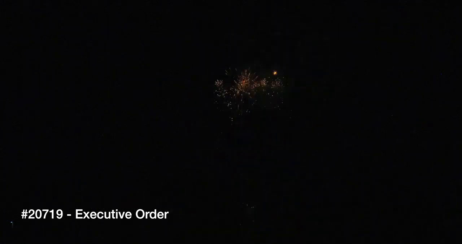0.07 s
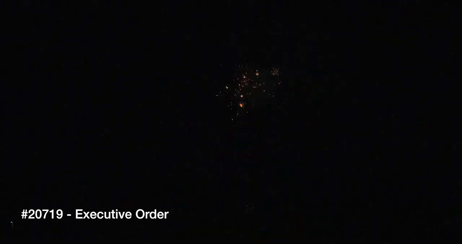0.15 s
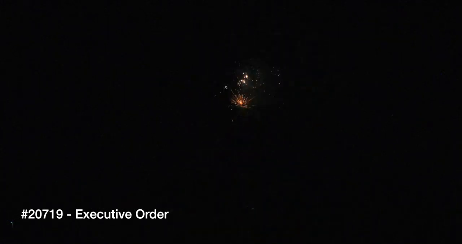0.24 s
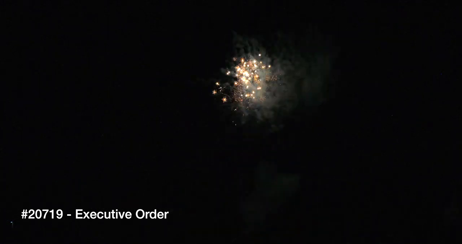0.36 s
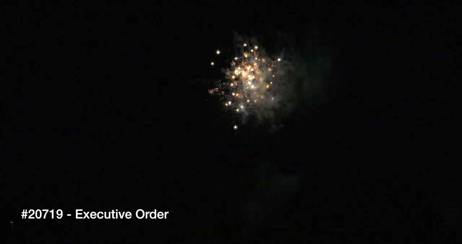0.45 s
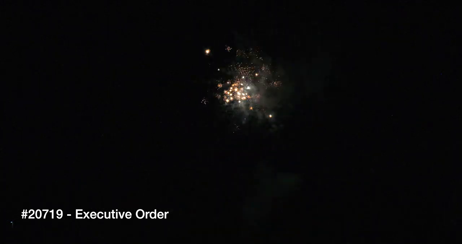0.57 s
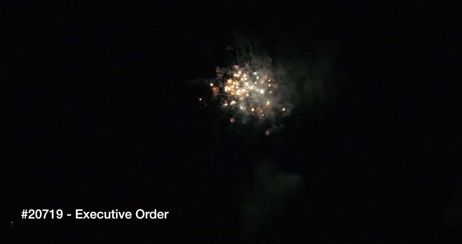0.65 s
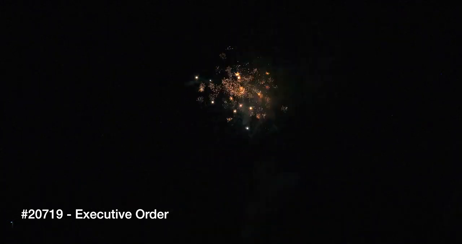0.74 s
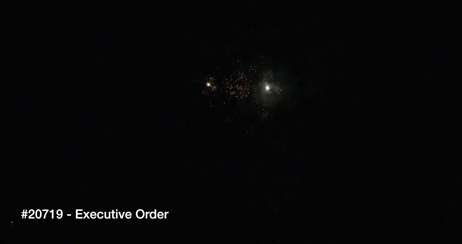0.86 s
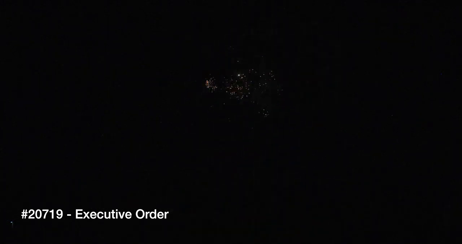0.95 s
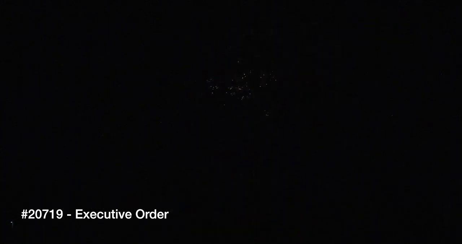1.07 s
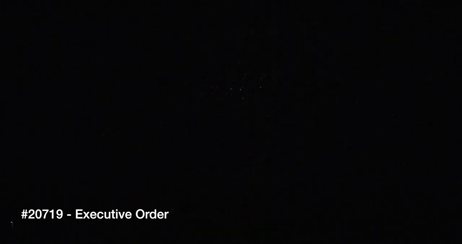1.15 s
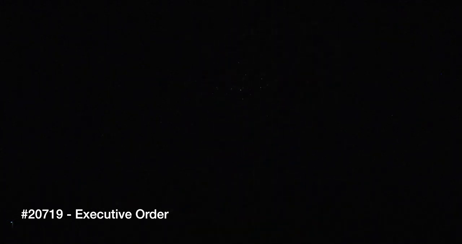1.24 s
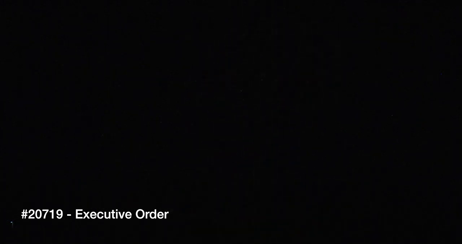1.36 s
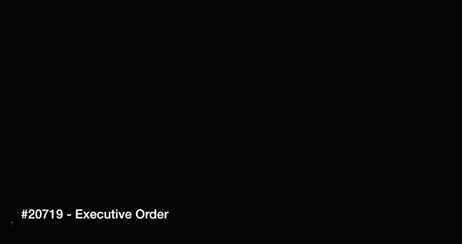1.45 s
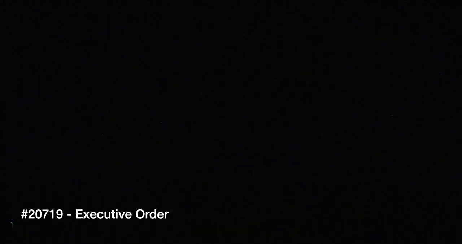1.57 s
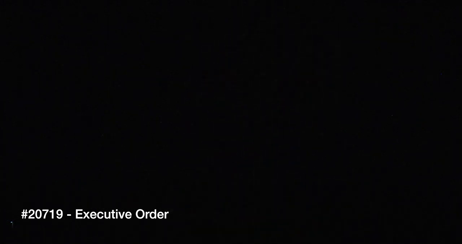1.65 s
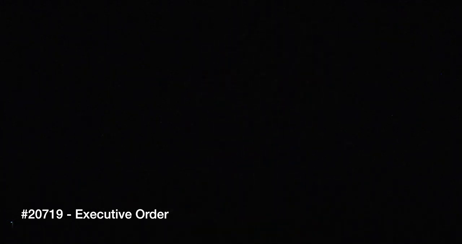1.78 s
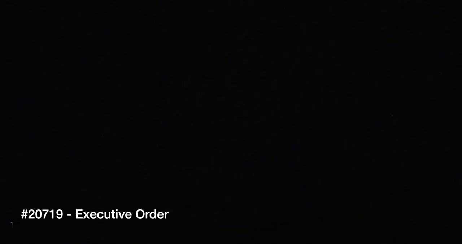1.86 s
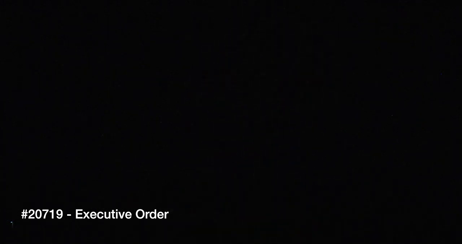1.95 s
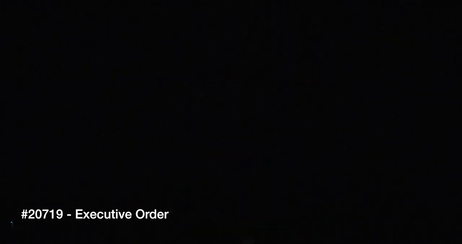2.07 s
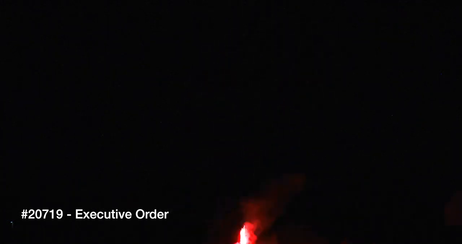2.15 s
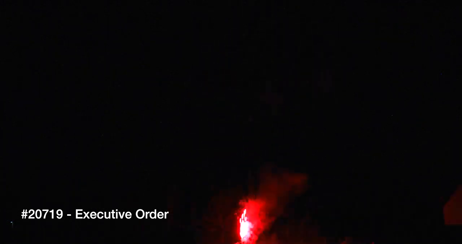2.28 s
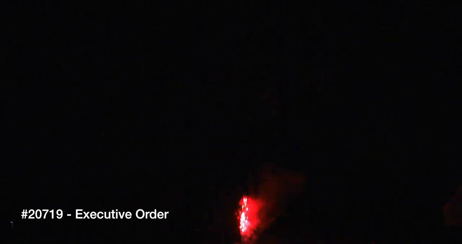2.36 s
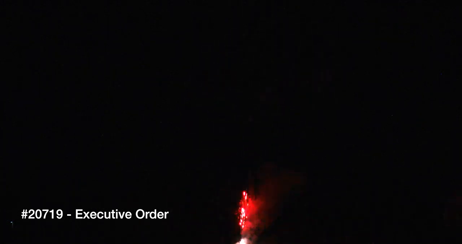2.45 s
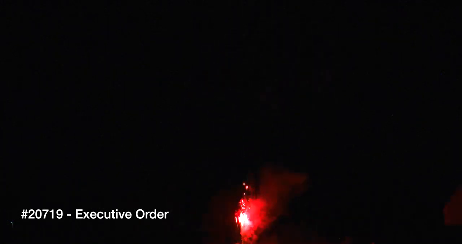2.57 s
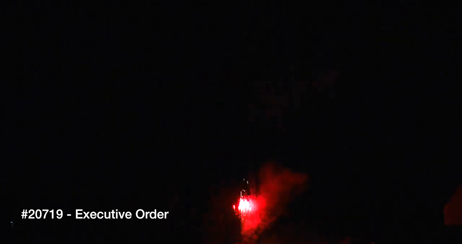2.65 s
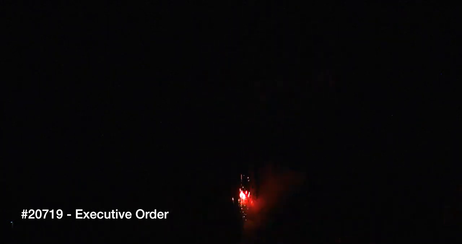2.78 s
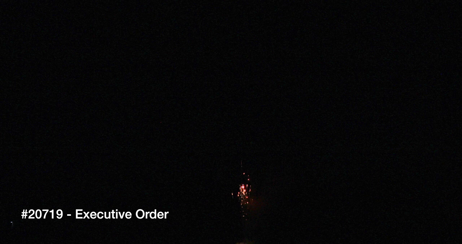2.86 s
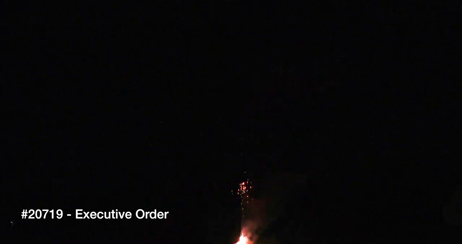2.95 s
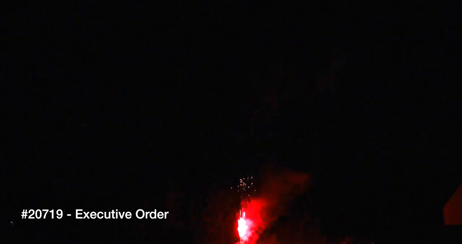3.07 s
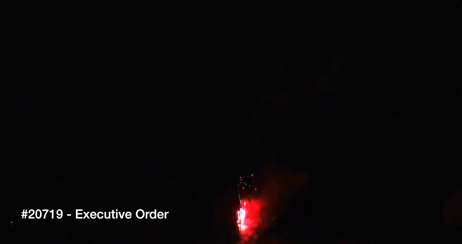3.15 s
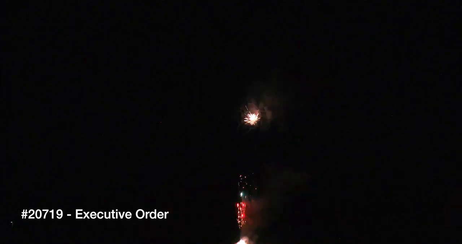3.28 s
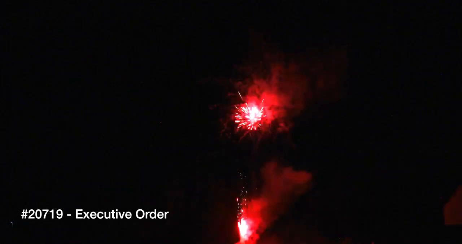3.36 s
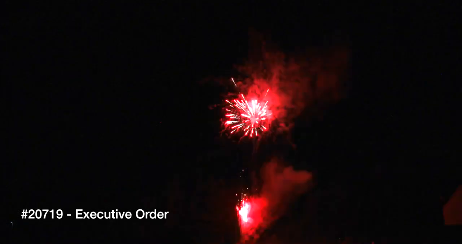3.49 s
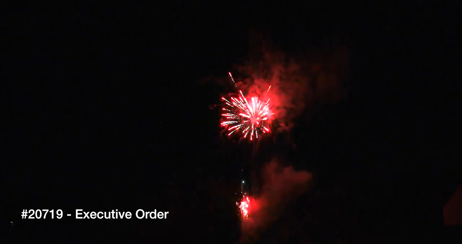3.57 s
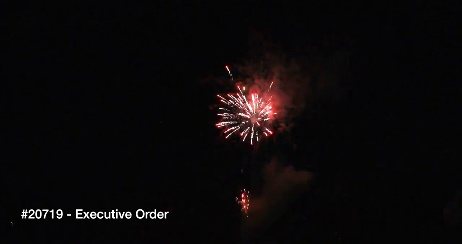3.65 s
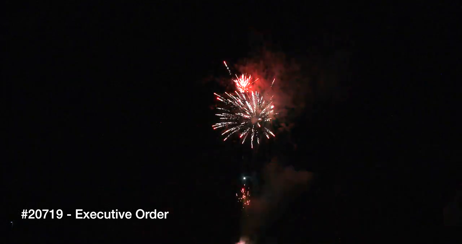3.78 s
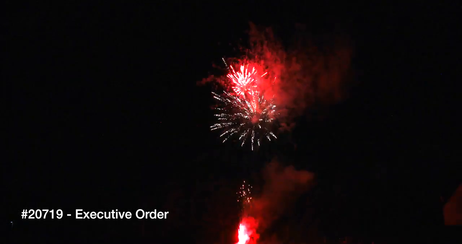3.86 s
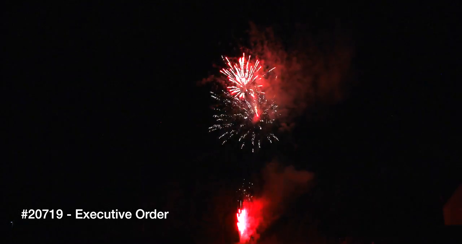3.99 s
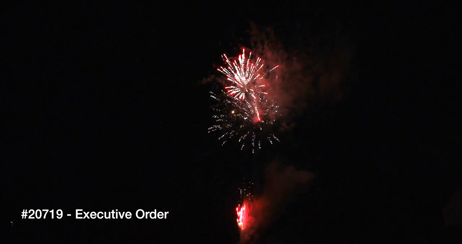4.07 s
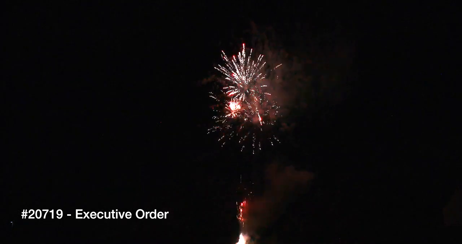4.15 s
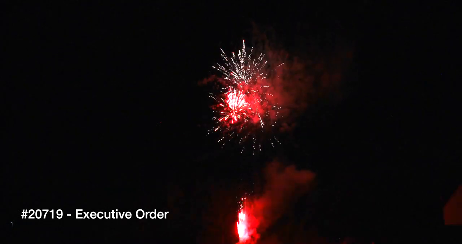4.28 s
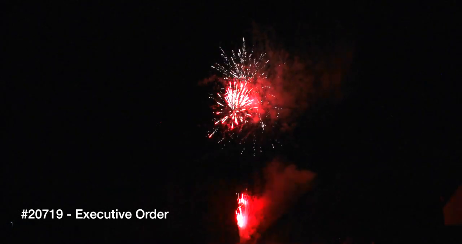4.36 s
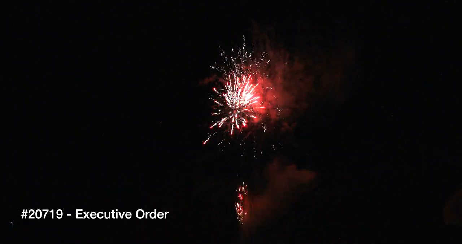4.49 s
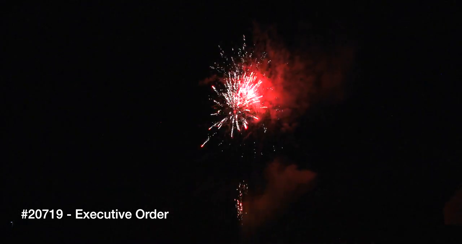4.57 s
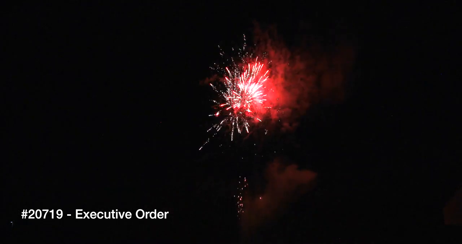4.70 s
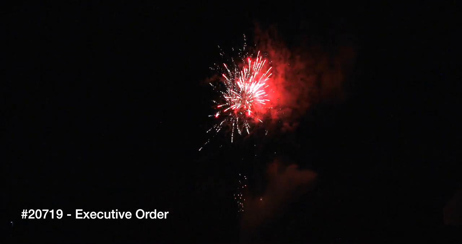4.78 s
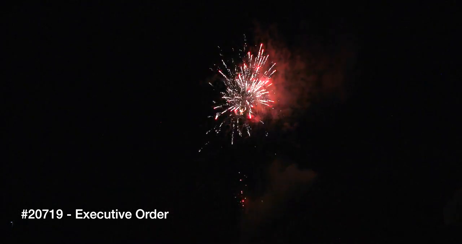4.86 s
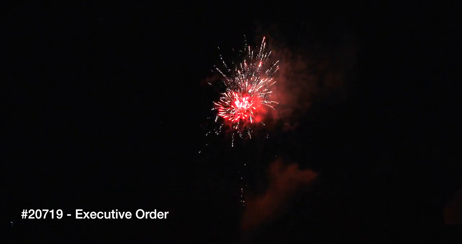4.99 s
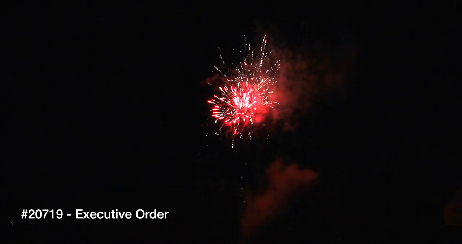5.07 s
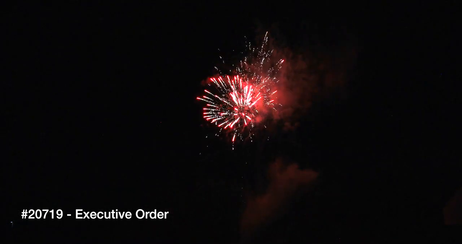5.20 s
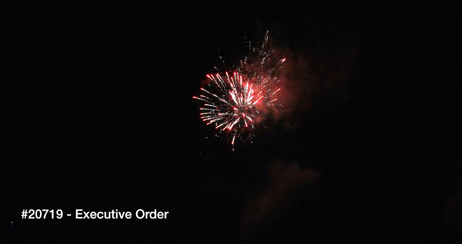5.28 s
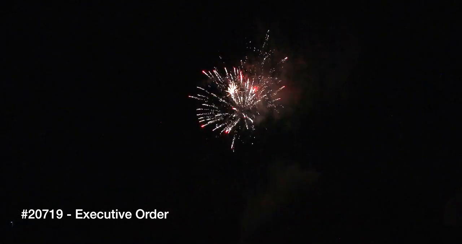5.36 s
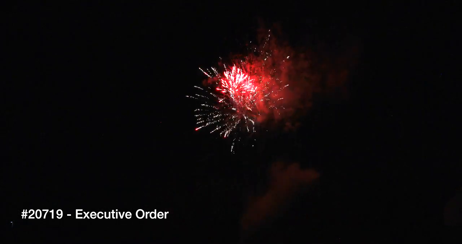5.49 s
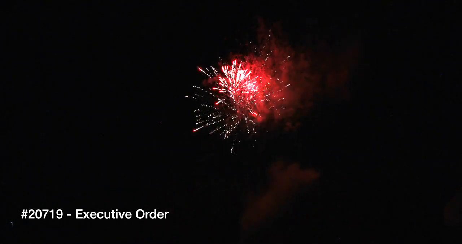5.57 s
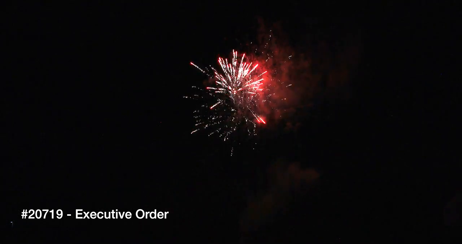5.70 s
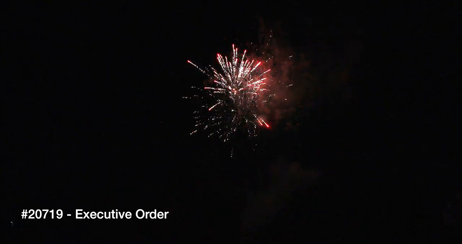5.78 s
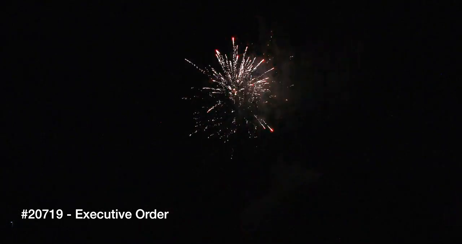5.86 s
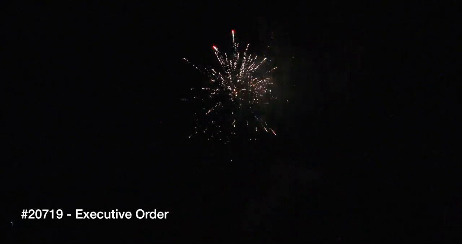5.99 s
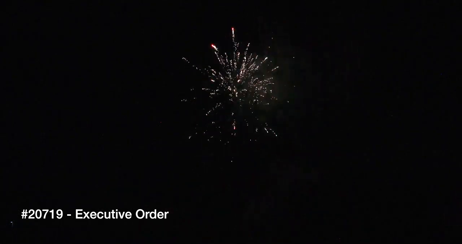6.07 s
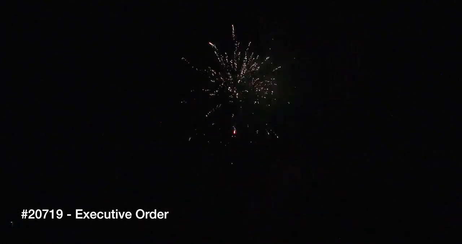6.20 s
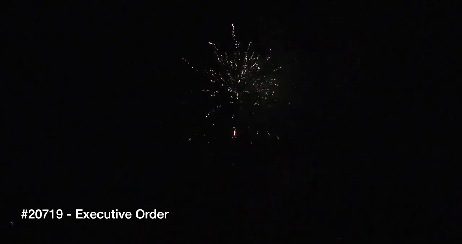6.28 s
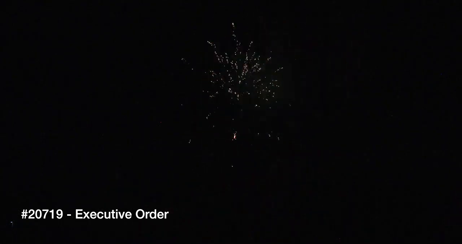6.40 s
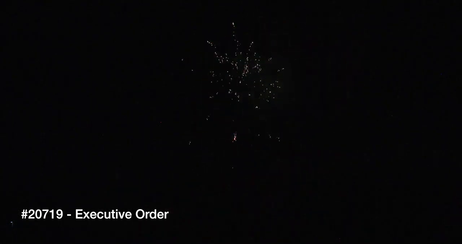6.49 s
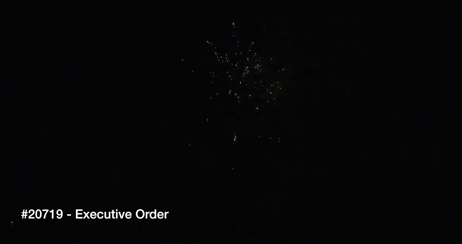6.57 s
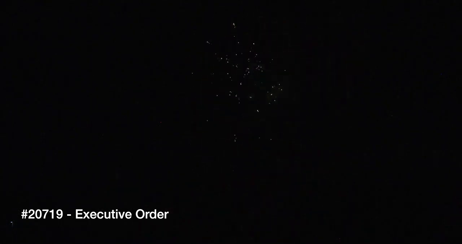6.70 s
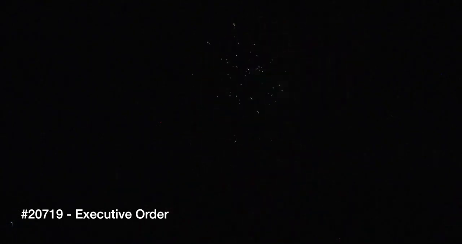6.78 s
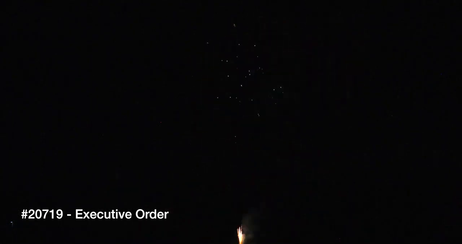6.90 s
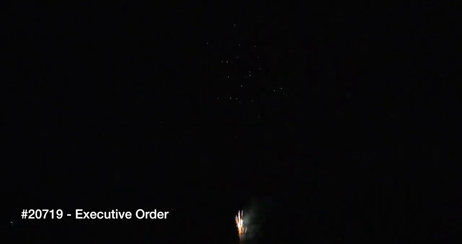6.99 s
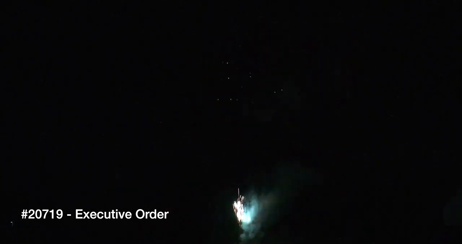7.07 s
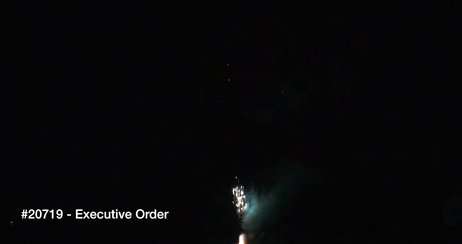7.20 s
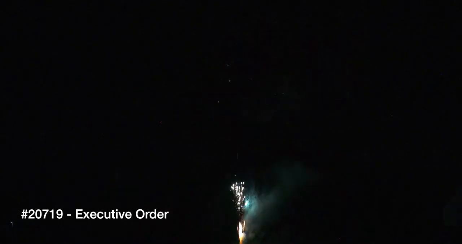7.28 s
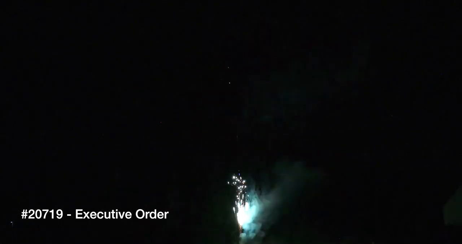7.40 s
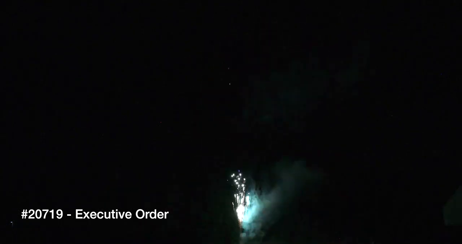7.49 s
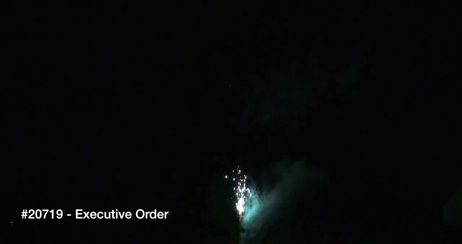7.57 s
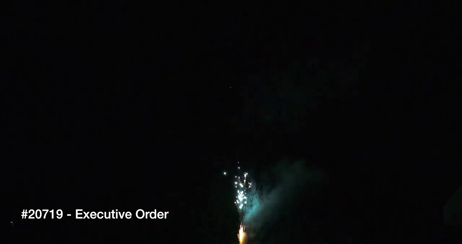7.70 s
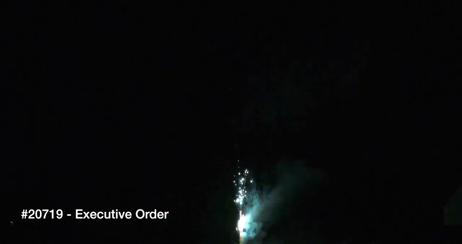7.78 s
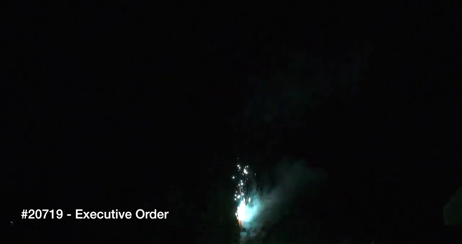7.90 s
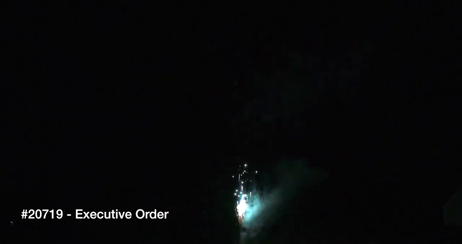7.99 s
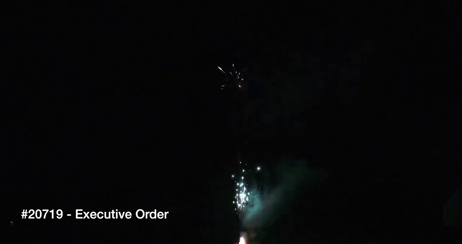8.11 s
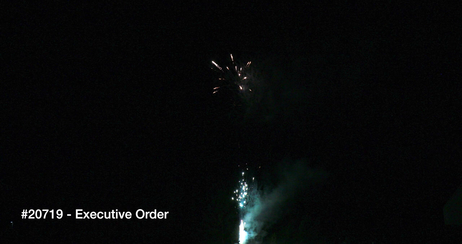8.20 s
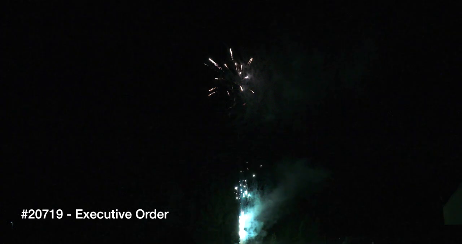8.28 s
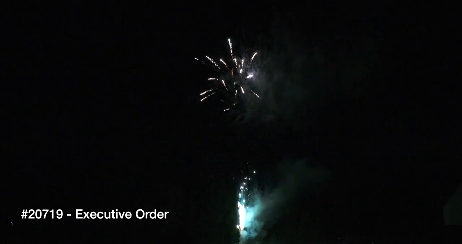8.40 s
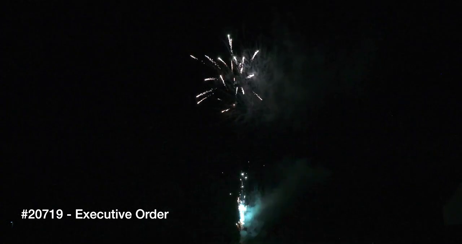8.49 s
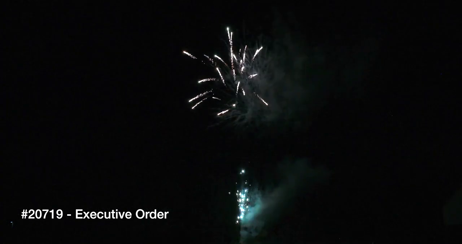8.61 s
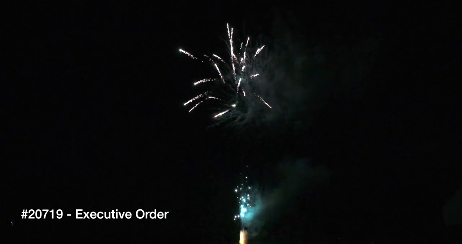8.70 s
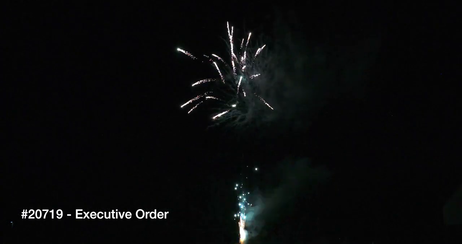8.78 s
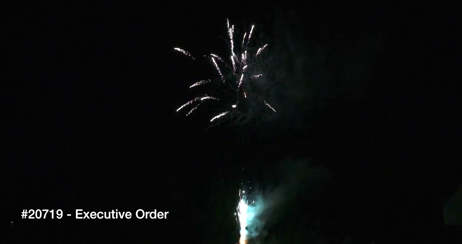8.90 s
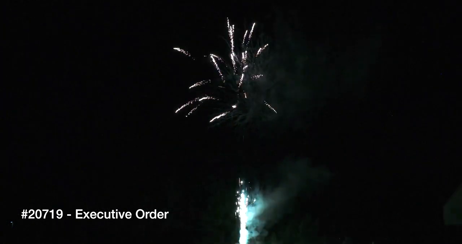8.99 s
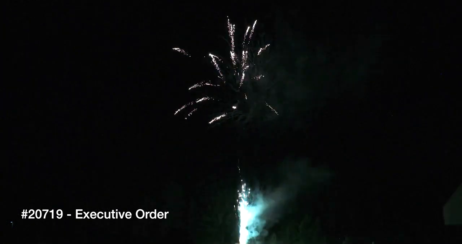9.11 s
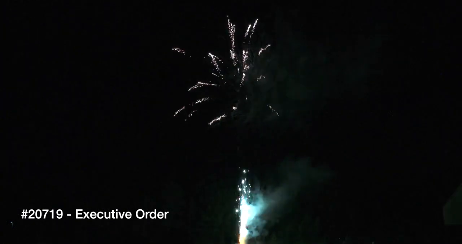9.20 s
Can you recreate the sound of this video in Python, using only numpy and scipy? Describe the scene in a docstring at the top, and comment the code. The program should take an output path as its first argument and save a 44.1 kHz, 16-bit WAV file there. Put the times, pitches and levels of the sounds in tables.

```python
"""Fireworks cake at night

Heard from a yard with a house wall behind and trees around. Shell bursts and mortar thumps are band-passed
clicks, returned by ground, wall, yard and trees. Comets hiss upward and echoes roll back as shaped noise.
Clouds of crackling stars are thousands of random tiny pops, and die out first; a far hum is a sine.
Loud blasts clip and duck the recorder's gain, so the echoes swell up after them."""
import sys
import numpy as np
from scipy import signal
from scipy.io import wavfile
from scipy.ndimage import minimum_filter1d

SR = 44100
rng = np.random.default_rng(int(sys.argv[2]) if len(sys.argv) > 2 else 0)


def persist_wave(psi):
    """Save psi, clipped to +-1, as 16-bit WAV."""
    counts = np.round(np.clip(psi, -1, 1) * 32767).astype(np.int16)
    wavfile.write(sys.argv[1], SR, np.atleast_2d(counts).T)


N = 407925
STEP = 32   # samples per point of the slow envelopes
TIME = np.arange(N) / SR
SLOW = TIME[::STEP]


# shell bursts: (time [s], relative bang level [dB], relative echo level [dB])
BURSTS = [(0.2981, 9.5, -9), (0.5498, 11.5, -11), (3.5997, 18.5, 6), (4.0616, 23, 3.5), (4.4750, 23, 3.5),
          (4.8180, 24, 2), (5.2391, 22.5, 2.5), (5.7234, 21.5, 2), (8.3450, 20.5, 4.5), (8.5586, 24.5, 2.5),
          (9.2430, 15, 12)]
# sky to microphones; direct, ground, wall, wall and ground, tree line: (delay [s], left [dB], right [dB])
SKY_PATHS = [(0, 4, 5.5), (.0038, -1, -7.5), (0.0119, 2.5, 4.5), (0.015, -18, 3), (.081, -7.5, -16)]


def shells(rate_ratio=0.996):
    """A burst is a short blast with a sharp shock front and low punch; strong echoers also recoil deeply."""
    fired = clicks(BURSTS)
    bang = from_db(-7) * blast(fired, low_hz=980, high_hz=6270)
    for k in range(3):   # no two shells in a row swing at the same rate
        rate = rate_ratio ** (k - 1)
        bang = bang + blast(clicks(BURSTS[k::3]), low_hz=420 * rate, high_hz=1200 * rate)
    punch = from_db(-23.5) * blast(fired, low_hz=166, high_hz=308)
    recoil_train = clicks([(s, bang_db + echo_db) for s, bang_db, echo_db in BURSTS])
    recoil = from_db(-39) * blast(recoil_train, low_hz=25, high_hz=212)
    yard = scatter(bang, low_hz=530, high_hz=1560, t60_s=0.23, level_db=2.5)
    yard = yard + scatter(bang, low_hz=1580, high_hz=6840, t60_s=0.093, level_db=6)
    return arrive(bang - punch + recoil, SKY_PATHS) + yard


# mortar shots: (time [s], relative thump level [dB], relative comet hiss level [dB])
LIFTS = [(2.4604, 6.5, -2), (2.7978, 6, -5), (3.2585, 6, -3.5), (4.1412, 14.5, 6), (4.5280, 9, 3),
         (7.2219, 8.5, 3.5), (7.5495, 9, 0.5), (8.0028, 9, -2), (8.443, 11, -6), (9.032, 13, 2.5),
         (9.2105, 10.5, 4)]
# cake to microphones; direct, wall: (delay [s], left [dB], right [dB])
LOW_PATHS = [(0, -1, 1.1), (0.0118, -5.5, -1.5)]
SPIT_RE_THUMP_DB = -13.5


def mortars(leak_s=0.0016, spit_s=0.0041):
    """Gas spits past the shell, then the tube uncorks with a low thump and a deep push."""
    fired = clicks(LIFTS)
    thump = blast(fired, low_hz=115, high_hz=255.5)
    broad_push = from_db(-17.5) * blast(fired, low_hz=56.6, high_hz=560)   # escaping gas
    deep_train = clicks([(s, thump_db + volley(s)[0]) for s, thump_db, _ in LIFTS])
    deep_push = blast(deep_train, low_hz=49.6, high_hz=100)
    gas = 0
    for s, thump_db, _ in LIFTS:
        rise_and_fall = np.exp(np.minimum((SLOW - s) / leak_s, (s - SLOW) / spit_s))
        gas = gas + from_db(thump_db + SPIT_RE_THUMP_DB) * rise_and_fall
    spit = band(rng.standard_normal(N), 2000, 3640, order=1)
    spit = np.interp(TIME, SLOW, gas) * spit / spit.std()
    shot = thump + broad_push - deep_push + spit
    yard = scatter(shot, low_hz=133, high_hz=496, t60_s=0.27, level_db=-5.5, apart=0.35)
    return arrive(shot, LOW_PATHS) + yard


# each volley's kind of tube and comet: (start [s], deep push re thump [dB], hiss pitch [ratio])
VOLLEYS = [(2.4, -25.5, 0.9), (7.1, -17.5, 1.066)]


def volley(s):
    """Deep push and hiss pitch of the volley that a shot belongs to."""
    return [row[1:] for row in VOLLEYS if row[0] <= s][-1]


# colour of the climbing comet: (frequency [Hz], relative density [dB per Hz])
COMET = [(300, -61), (900, -43), (1400, -45), (1950, -38), (3100, -49), (5000, -51), (9000, -62.5),
         (15000, -71)]
# colour of the mortar's spit off the nearest trees: (frequency [Hz], relative density [dB per Hz])
SPIT_ECHO = [(300, -54), (900, -42), (2000, -42.5), (3200, -42), (4500, -45.5), (7000, -48.5), (10000, -57),
             (15000, -80)]


def comets(tree_line_s=0.061, return_rise_s=0.0023, return_t60_s=0.5,
           climb_s=0.14, climb_rise_s=0.014, climb_t60_s=0.91,
           ground_gain=0.1, first_lag_s=0.00026, last_lag_s=0.0013):
    """Near trees throw the spit back; the hiss, pitched by its volley, builds and dulls as it climbs."""
    def power_at(hz):
        air = (hz / 2000) ** -.25   # treble dies sooner; both t60 hold at 2 kHz
        back, climb = 0, 0
        for s, _, hiss_db in LIFTS:
            back = back + from_db(hiss_db) ** 2 * swell(s + tree_line_s, return_rise_s, return_t60_s * air)
            level_db = hiss_db - 1.0 + at_hz(COMET, hz / volley(s)[1])
            climb = climb + from_db(level_db) ** 2 * swell(s + climb_s, climb_rise_s, climb_t60_s * air)
        return from_db(at_hz(SPIT_ECHO, hz)) ** 2 * back + climb

    hiss = diffuse(power_at, patchy_db=2.0, grain_db=0.0)
    starts = np.array(LIFTS)[:, 0]
    latest = starts[np.maximum(np.searchsorted(starts, TIME) - 1, 0)]
    age = np.abs(TIME - latest)
    # the ground reflection lags more with height
    lag = last_lag_s + (first_lag_s - last_lag_s) * np.exp(-age / .5)
    return hiss + ground_gain * np.array([np.interp(TIME - lag, TIME, side) for side in hiss])


# last stragglers of the cloud: (time [s], relative peak level [dB])
POPS = [(1.160, 6.5), (1.201, 8.5), (1.261, 9.5)]
# star clouds, fuses ending around a common moment: (thickest [s], relative level [dB], spread [s])
CLOUDS = [(0.031, -8, 0.047), (0.268, -3.5, 0.054), (0.413, -10, 0.03), (0.813, -1.5, .065),
          (1.068, 0, 0.062)]
POPS_PER_S, POPS_DB = 4000, -23.5   # at the height of a lone 0 dB cloud


def crackle(spread_db=2.0, thinning=.55):
    """Thousands of tiny charges pop; those left or right in the cloud reach one microphone earlier."""
    # early and late pops are fewer and weaker
    per_s = POPS_PER_S * sum(bell(TIME, s, spread_s) for s, _, spread_s in CLOUDS) ** thinning
    chance = per_s / SR
    loudness = from_db(POPS_DB) * np.sqrt(cloud_power(TIME))
    out = arrive(pops(clicks(POPS)), LOW_PATHS)
    for lag_samples in (-1, 2, 3):
        sizes = from_db(spread_db * np.minimum(rng.exponential(1, N), 3))
        fired = rng.random(N) < chance / 3
        heard = pops(fired * sizes / sizes.std() / np.sqrt(chance) * loudness)
        out = out + np.array([heard, np.roll(heard, lag_samples)])
    return out


def pops(train):
    """The snap of tiny charges, with some body and no bass."""
    body = from_db(-4) * blast(train, low_hz=286, high_hz=2150)
    snap = blast(train, low_hz=940, high_hz=6000)
    return band(snap + body, low_hz=150.0, high_hz=16600)


def cloud_power(t):
    """Power of all the crackling clouds together."""
    return sum(from_db(db) ** 2 * bell(t, s, spread_s) for s, db, spread_s in CLOUDS)


# colours of the returning bursts, shots and crackle: (frequency [Hz], relative density [dB per Hz])
BURST_ECHO = [(50, -61), (100, -56.5), (170, -47), (300, -46), (500, -39), (750, -32.5), (1200, -33.5),
              (2000, -39.5), (4000, -40), (7000, -46.5), (10000, -46.5), (15000, -46)]
LIFT_ECHO = [(50, -65), (100, -49), (170, -41.5), (280, -49), (600, -48.5), (1200, -46.5), (4000, -49),
             (15000, -66)]
CRACKLE_ECHO = [(50, -80), (170, -79), (300, -88), (500, -89), (900, -42), (1500, -49), (4500, -49),
                (8000, -52), (15000, -80)]
# distant slopes return each burst: (delay [s], level re burst echo [dB])
FAR_ECHOES = [(.43, -4), (.60, -5)]
# dull colour of the slopes: (frequency [Hz], relative density [dB per Hz])
FAR_COLOUR = [(100, -79.5), (400, -40.5), (750, -29), (1300, -43), (3000, -51.5), (10000, -75)]
# night murk: (frequency [Hz], relative density [dB per Hz])
NIGHT = [(30, -79), (90, -69), (200, -65.5), (500, -52), (900, -57), (1500, -64.5), (3000, -70),
         (7000, -89), (15000, -84)]
# decay among the trees: (frequency [Hz], t60 [s])
TREES_T60 = [(60, 7), (200, 5.4), (600, 5.4), (1150, 3.11), (2000, 2.37), (4000, 1.5), (7000, 1),
             (14000, 0.26)]
ECHO_RE_HISS_DB, ECHO_TILT_DB_PER_OCTAVE = -1, 0.5


def trees(burst_rise_s=0.11, lift_rise_s=0.061, far_rise_s=0.013, far_t60_s=1.0):
    """Everything rolls back from the trees, losing its treble first, over the night's low murk."""
    cloud = cloud_power(SLOW)
    far = 0
    for s, _, echo_db in BURSTS:
        for delay_s, far_db in FAR_ECHOES:
            far = far + from_db(echo_db + far_db) ** 2 * swell(s + delay_s, far_rise_s, far_t60_s)

    def power_at(hz):
        t60_s = at_hz(TREES_T60, hz)
        tilt_db = ECHO_TILT_DB_PER_OCTAVE * np.log2(hz / 1000)
        bursts = sum(from_db(echo_db + tilt_db) ** 2 * swell(s, burst_rise_s, t60_s)
                     for s, _, echo_db in BURSTS)
        lifts = sum(from_db(hiss_db + ECHO_RE_HISS_DB) ** 2 * swell(s, lift_rise_s, t60_s)
                    for s, _, hiss_db in LIFTS)
        stars = smooth(cloud, t60_s / np.log(1e6), SR / STEP)
        layers = [(BURST_ECHO, bursts), (FAR_COLOUR, far), (LIFT_ECHO, lifts),
                  (CRACKLE_ECHO, stars), (NIGHT, 1)]
        return sum(from_db(at_hz(colour, hz)) ** 2 * power for colour, power in layers)

    return diffuse(power_at, patchy_db=1.3, grain_db=1.0)


HUM_HZ, HUM_RMS_DB = 180, -35
HUM_PEAK_S, HUM_SPREAD_S = 6.4, 1.25


def hum():
    """A faint far hum of steady pitch swells once and fades."""
    level = from_db(HUM_RMS_DB) * np.sqrt(2 * bell(TIME, HUM_PEAK_S, HUM_SPREAD_S))
    return level * np.sin(2 * np.pi * HUM_HZ * TIME)


def from_db(db):
    """Decibels to gain."""
    return 10 ** (np.asarray(db) / 20)


def at_hz(points, hz):
    """Read a table on a log-frequency axis."""
    points = np.array(points)
    return np.interp(np.log(hz), np.log(points[:, 0]), points[:, 1])


def band(x, low_hz, high_hz, order=2):
    """Causal band-pass."""
    edges_hz = [low_hz, min(high_hz, .45 * SR)]
    return signal.sosfilt(signal.butter(order, edges_hz, "band", fs=SR, output="sos"), x + 1e-18)


def smooth(x, seconds, per_s):
    """One-pole lag on a signal with per_s points a second."""
    r = np.exp(-1 / (seconds * per_s))
    return signal.lfilter([1 - r], [1, -r], x + 1e-18)


def flutter(seconds):
    """Slow random wander with spread 1."""
    x = smooth(rng.standard_normal(len(SLOW)), seconds, SR / STEP)
    return x / x.std()


def bell(t, centre_s, spread_s):
    """Power that rises to 1 and falls again, with exponential skirts."""
    return 1 / np.cosh(np.clip((t - centre_s) / spread_s, -40, 40)) ** 2


def swell(start_s, rise_s, t60_s):
    """Power of a sound that builds up and dies away."""
    age = np.maximum(SLOW - start_s, 0)
    return (1 - np.exp(-(age / rise_s) ** 2)) * np.exp(-np.log(1e6) * age / t60_s)


def clicks(rows):
    """One single-sample click for each (time [s], level [dB])."""
    out = np.zeros(N)
    for s, db, *_ in rows:
        out[min(round(s * SR), N - 1)] = from_db(db)
    return out


def blast(train, low_hz, high_hz):
    """Each unit click becomes a pressure swing of height 1; a lower band swings slower."""
    height = np.abs(band(signal.unit_impulse(SR // 20), low_hz, high_hz)).max()
    return -band(train, low_hz, high_hz) / height


def arrive(x, paths):
    """Sum the delayed copies that reach each microphone."""
    out = 0
    for delay_s, left_db, right_db in paths:
        delayed = np.pad(x, (round(abs(delay_s) * SR), 0))[:N]
        out = out + delayed * from_db([[left_db], [right_db]])
    return out


def scatter(x, low_hz, high_hz, t60_s, level_db, apart=0.57):
    """Dense small reflections from the things in the yard, following the wall echo."""
    t = TIME[:SR // 4]
    common, left, right = rng.standard_normal((3, len(t)))
    noise = common + apart * np.array([left, right])
    tail = band(noise * from_db(-60 * t / t60_s), low_hz, high_hz)
    energy = np.mean(np.sum(tail ** 2, axis=1))
    tail *= from_db(level_db) * np.sqrt(2 * (high_hz - low_hz) / SR / energy)
    delayed = np.pad(x, (round(LOW_PATHS[1][0] * SR), 0))
    return signal.fftconvolve(delayed[None], tail, axes=1)[:, :N]


# diffuse sound at the two microphones: (frequency [Hz], side re mid [dB])
WIDTH = [(60, -20), (200, -10.5), (600, -9), (1300, -9), (2400, -6.5), (4400, -4.5), (8000, -0.5),
         (13000, 4)]


def diffuse(power_at, patchy_db, grain_db):
    """Stereo noise in half-octave bands; power_at(hz) gives each band's power per Hz in time."""
    edges_hz = 22 * 2 ** np.arange(0, 10, .5)
    white = rng.standard_normal((2, 2, N)) * np.sqrt(SR / 2)
    mid_side = np.zeros((2, N))
    # random level jumps, each dying away, roughen all bands together
    jumps = np.minimum(rng.exponential(1, len(SLOW)), 3) ** 2
    grain = smooth(jumps, 0.0063, SR / STEP)
    grain = (grain - grain.mean()) / grain.std()
    for k, (low_hz, high_hz) in enumerate(zip(edges_hz, edges_hz[1:])):
        hz = np.sqrt(low_hz * high_hz)
        gain = np.sqrt(power_at(hz)) * from_db(grain_db * grain + patchy_db * flutter(0.033))
        share = np.array([[1], [from_db(at_hz(WIDTH, hz))]])
        share = share / np.linalg.norm(share)
        mid_side += band(white[k % 2], low_hz, high_hz) * share * np.interp(TIME, SLOW, gain)
    mid, side = mid_side
    return np.array([mid + side, mid - side])


def scene():
    """The display stands slightly to the right."""
    layers = shells() + mortars() + comets() + crackle() + trees() + hum()
    return layers * from_db([[-.6], [.6]])


def duck(excess_db, release_db_per_s, attack_s):
    """Gain that drops by the excess level and climbs back at a steady rate, both lagged by attack_s."""
    ramp = release_db_per_s * SLOW
    cut_db = np.maximum.accumulate(np.maximum(excess_db, 0) + ramp) - ramp
    return np.interp(TIME, SLOW, from_db(-smooth(cut_db, attack_s, SR / STEP)))


CUTOFF_HZ = 15900


def record(dry, target_db=-11, limit_db=7.0, hold_s=0.061, sensed_top=0.82, treble_hz=11500):
    """Slow gain control, a limiter that holds and recovers, clipping of what slips through, top cut."""
    sensed = np.minimum(np.mean(dry ** 2, axis=0), sensed_top)
    power = smooth(sensed, 0.042, SR)[::STEP]
    x = dry * duck(10 * np.log10(power) - target_db, release_db_per_s=6.0, attack_s=0.011)
    hold = 2 * int(hold_s * SR / 2) + 1
    # running maximum over the past hold_s
    peak = -minimum_filter1d(-np.abs(x).max(axis=0), hold, origin=hold // 2)[::STEP]
    x = x * duck(20 * np.log10(peak + 1e-9) - limit_db, release_db_per_s=184, attack_s=0.012)
    x = x / (1 + x ** 12) ** (1 / 12)   # clips at 1 with a narrow knee
    x = signal.sosfilt(signal.butter(1, min(treble_hz, .45 * SR), fs=SR, output="sos"), x)
    return signal.sosfilt(signal.ellip(9, .1, 70, CUTOFF_HZ, fs=SR, output="sos"), x)


dry = scene()
out = record(dry)
persist_wave(out)
```